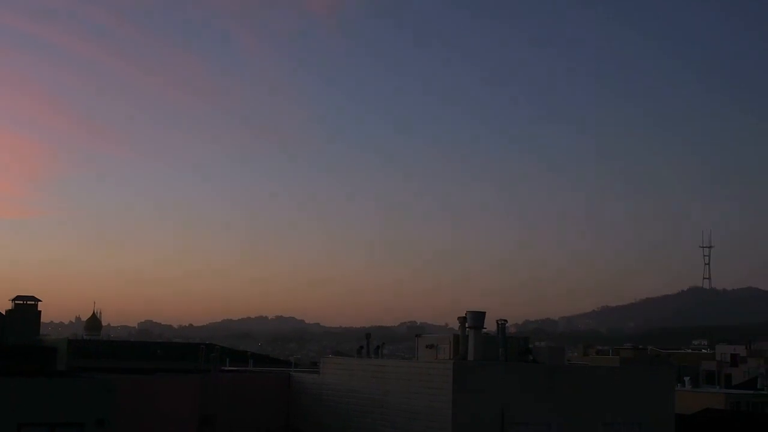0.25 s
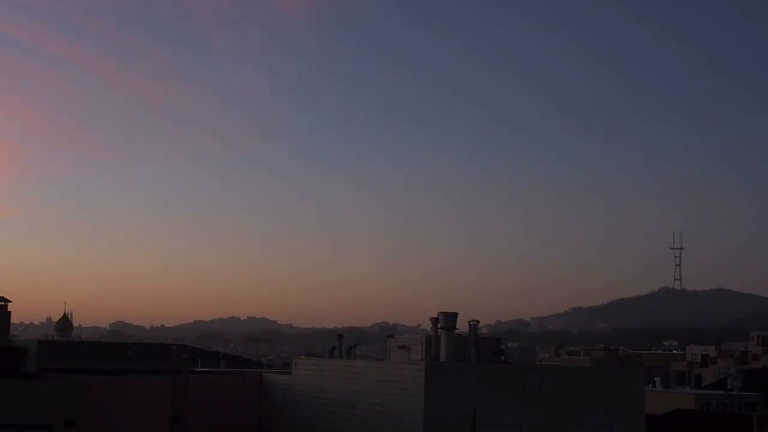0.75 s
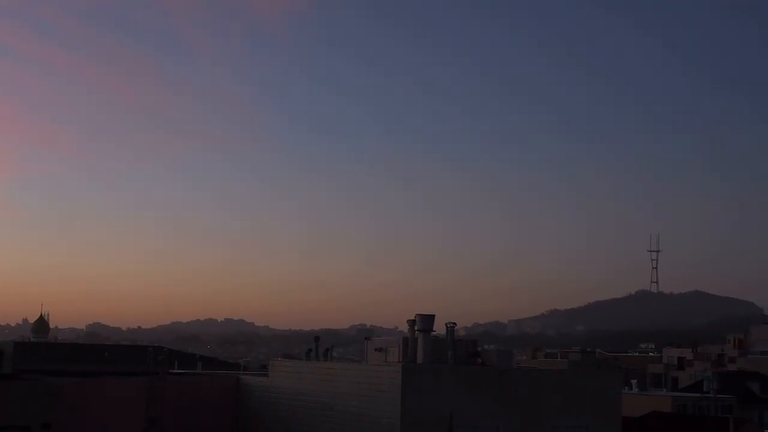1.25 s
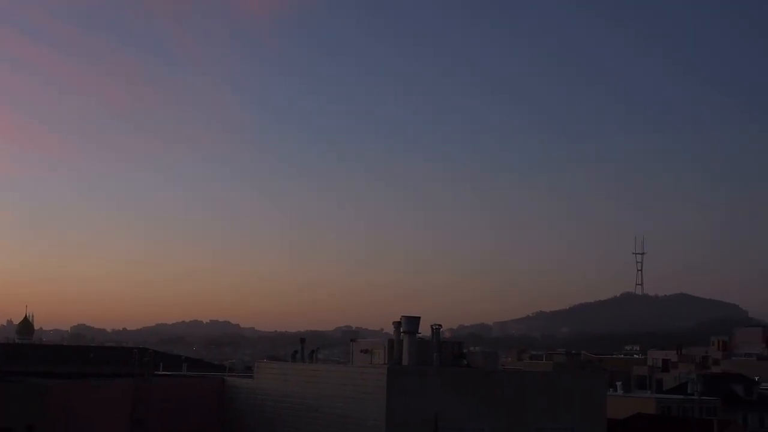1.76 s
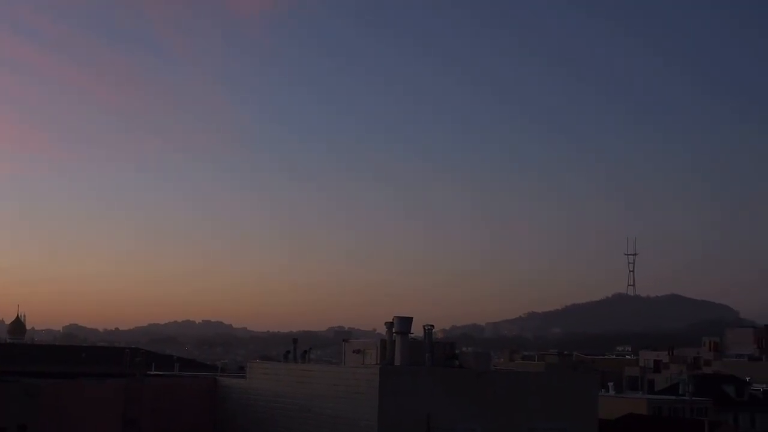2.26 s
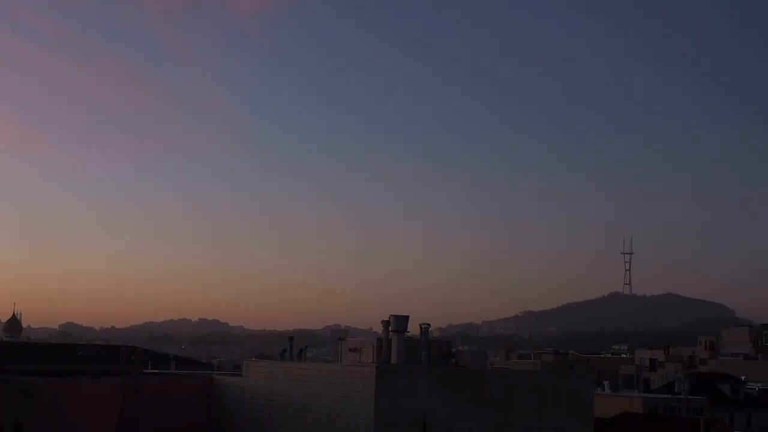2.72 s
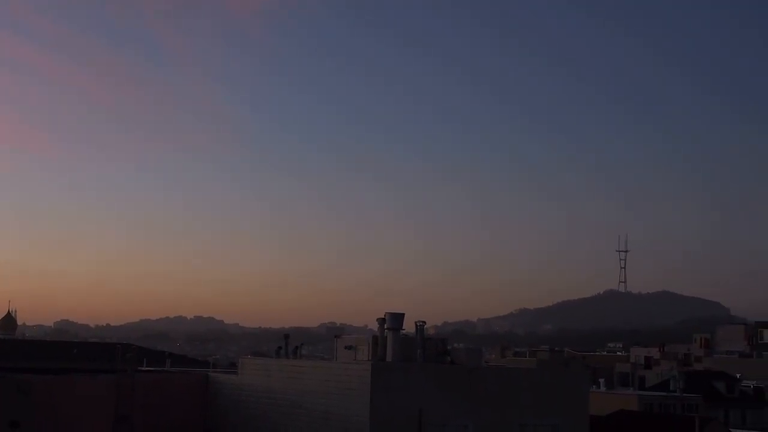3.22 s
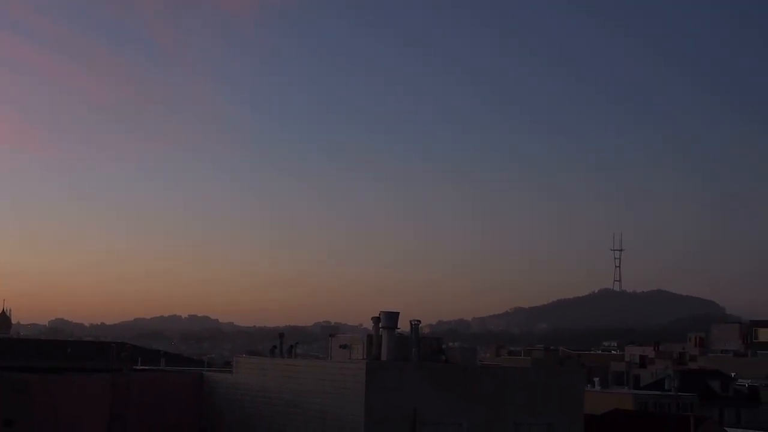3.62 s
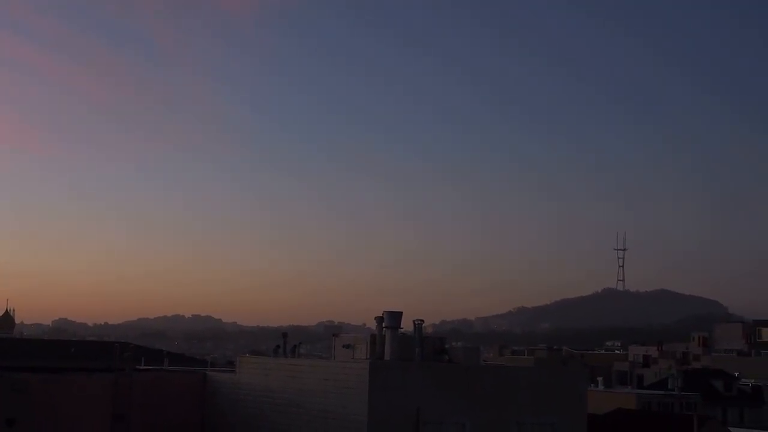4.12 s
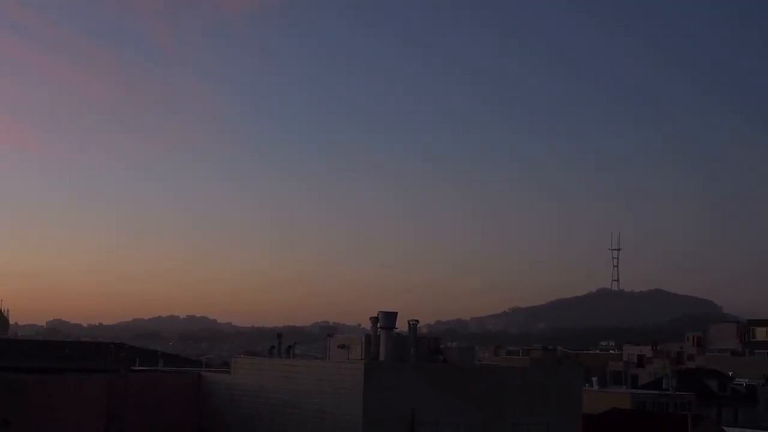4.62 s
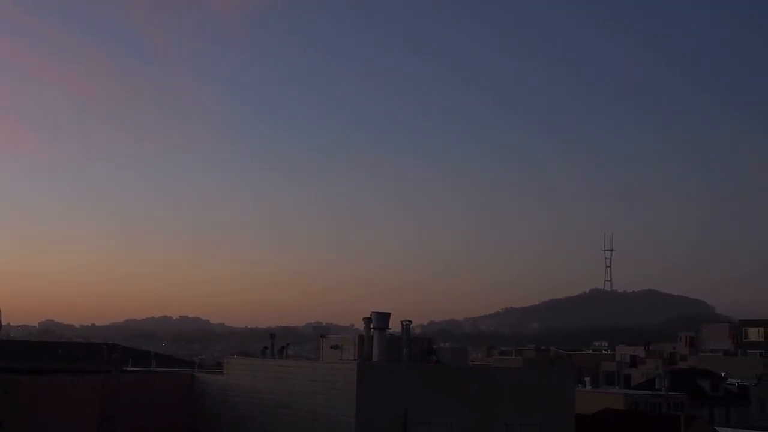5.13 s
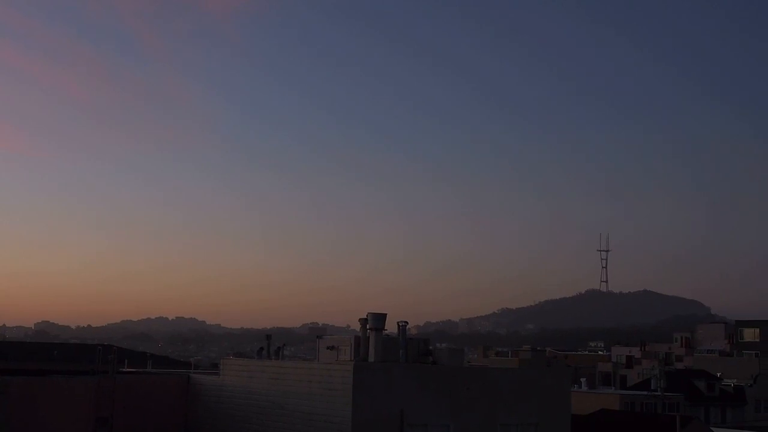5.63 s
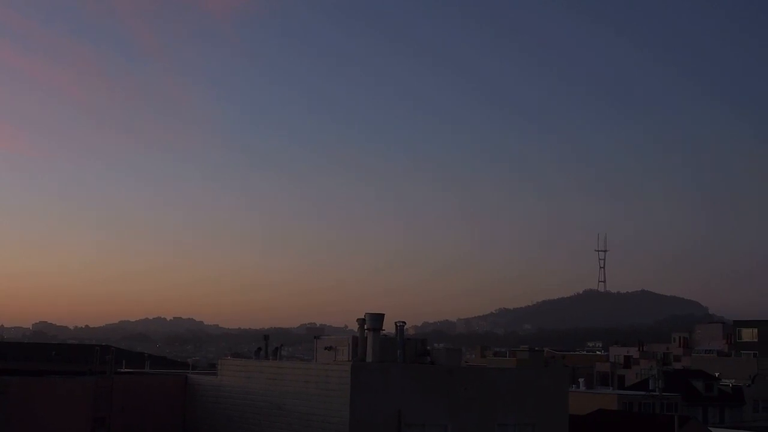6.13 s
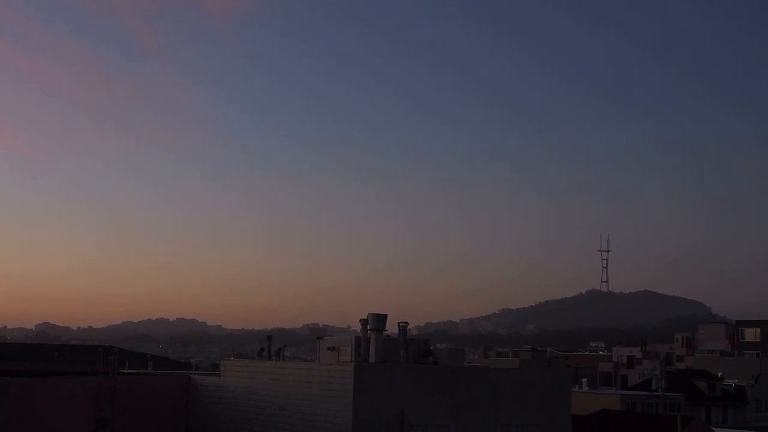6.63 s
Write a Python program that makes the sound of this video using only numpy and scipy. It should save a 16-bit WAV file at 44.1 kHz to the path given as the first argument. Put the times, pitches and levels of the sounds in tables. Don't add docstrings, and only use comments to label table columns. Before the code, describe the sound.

Wide stereo outdoor ambience above city roofs at dawn. A low, soft traffic rumble and fan hum run throughout. A songbird's rising whistle ends at the start, then five quick arched syllables and later four burry falling notes follow. A nearer bird on the left gives single sharp chips, loudest near the end. Faint distant chips and a thin trill fill the gaps, all echoing off walls.

```python
import sys
import numpy as np
from scipy import signal
from scipy.io import wavfile
from scipy.ndimage import uniform_filter1d

SR = 44100
rng = np.random.default_rng(int(sys.argv[2]) if len(sys.argv) > 2 else 0)


def decibels_to_gain(level_db):
    exponent = np.asarray(level_db, float) / 20
    return 10 ** exponent


def dump(signal):
    limited = np.clip(np.atleast_2d(signal).T, -1, 1)
    pcm = np.round(limited * 32767).astype(np.int16)
    wavfile.write(sys.argv[1], SR, pcm)


N = 302967
BEFORE = 22050

# [t/s from the onset, f/Hz, level/dB]
CHIP = [(0, 7400, -44), (.002, 5750, -24), (.0035, 5450, -17.5), (.007, 5230, -9), (.014, 4960, -7),
        (.024, 4760, -3), (.031, 4750, -8), (.039, 4880, -6.5), (.054, 4910, -24.5)]


def evened(x):
    return x / np.sqrt(np.mean(x ** 2) + 1e-20)


def read(points, hz):
    f, value = np.transpose(points)
    return np.interp(np.log(hz + 1), np.log(f + 1), value)


def city():
    # [f/Hz, level/dB per Hz]
    city_curve = [(20, -53), (33, -19), (114, -3), (187, -4.5), (224, -2.5), (262, -5.5), (291, -3.5),
                  (378, -9.5), (545, -9), (873, -11.5), (1080, -14), (1360, -20.5), (3060, -30.5),
                  (5030, -31.5), (15500, -48.5)]
    city_db = -39.5
    # [f/Hz, width/Hz, level/dB]
    far_chorus = [
        (5070, 270, -73),
        (7730, 310, -74.5),
        (11600, 1300, -79),
    ]
    # [t/s, level/dB]
    rumble = [(0, -42.5), (1.4, -41.5), (2.4, -45), (5.3, -44.5), (5.9, -42.5), (6.87, -41.5)]
    # [f/Hz, correlation]
    likeness = [(60, 0.92), (130, 1), (290, 0.97), (640, 0.88), (1410, 0.51), (3100, -0.23), (6820, 0.38),
                (15000, -1.6)]
    # [f/Hz, level/dB]
    left_lean = [(60, 3.0), (110, 2.4), (200, 3.5), (380, 2.9), (700, 3), (1290, 1.5), (2380, 1.6),
                 (4400, 1.2), (8120, 1.6), (15000, 0.81)]

    frames, hz = N // 512 + 5, np.fft.rfftfreq(2048, 1 / SR)
    a, b, c, d, patches = rng.standard_normal((frames, 1025, 5)).T
    patches = uniform_filter1d(uniform_filter1d(patches, 16, 0), 15, 1)
    patches = evened(patches)

    shape = decibels_to_gain(2 * read(city_curve, hz))
    power = shape[:, None] / np.sum(shape) * decibels_to_gain(2 * city_db)
    for centre_hz, width, db in far_chorus:
        bump = np.exp(-((hz[:, None] - centre_hz) / width) ** 2)
        power = power + decibels_to_gain(2 * db) * bump / (width / hz[1])

    rumble_db = np.interp(np.arange(frames) * 512 / SR, *np.transpose(rumble))
    swell_db = (rumble_db - rumble_db.mean()) * np.exp(-(hz[:, None] / 230) ** 2)

    same = np.clip(read(likeness, hz), 0, 1)[:, None]
    left = a + 1j * b
    right = same * left + np.sqrt(1 - same ** 2) * (c + 1j * d)
    lean = decibels_to_gain(read(left_lean, hz) / 2)[:, None]
    z = np.array([left * lean, right / lean]) * np.sqrt(power) * decibels_to_gain(swell_db + 0.79 * patches)
    return 1.004 * signal.istft(z, nperseg=2048, noverlap=1536)[1][:, :N]


def fuzzy(hz, width):
    r = np.exp(-np.pi * width / SR)
    noise = rng.standard_normal(N) + 1j * rng.standard_normal(N)
    slow = signal.lfilter([1], [1, -2 * r, r * r], noise)
    carrier = np.exp(2j * np.pi * np.cumsum(hz * np.ones(N)) / SR)
    return evened((slow * carrier).real)


def drones():
    # [f/Hz, level/dB]
    fans = [
        (210, -56.5),
        (232, -56),
        (297, -59.5),
        (408, -66),
    ]
    # [middle t/s, half length/s, f/Hz, glide/Hz per s, level/dB]
    engines = [
        (0.104, .25, 228.6, .1, -45.5),
        (.2, 0.69, 408.3, .1, -51.5),
        (0.99, 0.073, 227, .1, -43),
        (1.498, .13, 299, 0.11, -45),
        (2.767, 0.11, 300, .1, -46.5),
        (5.153, 0.18, 208.2, 0.1027, -42.5),
        (5.5, 0.59, 295.5, .1, -53.5),
        (6.5, 0.48, 223.2, 25.4, -49),
    ]
    t = np.arange(N) / SR
    tones = sum(decibels_to_gain(db) * fuzzy(hz, 5.9) for hz, db in fans)
    for s, half, hz, glide, db in engines:
        waver = 1 + 0.01196 * evened(uniform_filter1d(rng.standard_normal(N), 3000))
        turns = 2 * np.pi * np.cumsum((hz + glide * (t - s)) * waver) / SR
        swell = np.exp(-((t - s) / half) ** 2)
        tones = tones + decibels_to_gain(db) * swell * np.sqrt(2) * np.sin(turns)
    return tones * decibels_to_gain([[1.4], [-1.4]])


def add(mix, s, sound, pan_db):
    part = mix[:, BEFORE + round(s * SR):][:, :len(sound)]
    part += decibels_to_gain([[pan_db / 2], [-pan_db / 2]]) * sound[:part.shape[1]]


def whistle(shape, db, pitch, partials_db, burr_hz=0, depth=0, wobble=0.0071, beak=True, air_db=-60):
    beak_hz, beak_width_hz = 7700, 1400
    s, hz, level_db = np.transpose(shape)
    t = np.arange(0, s[-1], 1 / SR)
    hz = uniform_filter1d(np.interp(t, s, pitch * hz), 60, mode="nearest")
    level_db = uniform_filter1d(np.interp(t, s, level_db), 60, mode="nearest")

    chance = evened(uniform_filter1d(rng.standard_normal(len(t)), 120))
    flutter = np.sin(2 * np.pi * (np.cumsum(burr_hz * (1 + 0.19 * chance)) / SR + rng.random()))
    flutter *= depth * np.minimum(0.27 + t / 0.051, 1)
    turns = 2 * np.pi * np.cumsum(hz * (1 + flutter + wobble * chance)) / SR

    air = signal.butter(4, [3600, 7800], "band", fs=SR, output="sos")
    tone = decibels_to_gain(air_db) * signal.sosfilt(air, rng.standard_normal(len(t)))
    for k, partial_db in enumerate(partials_db, 1):
        passed = np.exp(-((k * hz - beak_hz) / beak_width_hz) ** 2) if beak and k > 1 else 1
        tone = tone + decibels_to_gain(partial_db) * passed * np.sin(k * turns)
    level = np.sqrt(2) * decibels_to_gain(db + level_db) * (1 + 3.2 * flutter)
    return level * tone * signal.windows.tukey(len(t), .04)


def streets(birds, walls, tail_db, count, lumpy_db=5.5):
    # [f/Hz, t60/s]
    decay = [(1500, 1.7), (2800, 1.57), (3500, 1.07), (4900, 2.9), (6500, 0.69), (10000, 0.59)]
    size = 2 * SR
    taps = np.zeros((2, size))
    at = np.arange(200, size - 20, 20) + rng.integers(0, 20, (2, (size - 201) // 20))
    np.put_along_axis(taps, at, rng.choice([-1., 1.], at.shape), 1)

    hz, t, z = signal.stft(taps + 0.35 * taps[::-1], SR, nperseg=256)
    lumps_db = lumpy_db * evened(uniform_filter1d(rng.standard_normal(len(t)), 5))
    fading_db = lumps_db - 60 * t / read(decay, hz)[:, None]
    tail = signal.istft(z * decibels_to_gain(fading_db), SR, nperseg=256)[1]
    tail *= decibels_to_gain(tail_db) / np.linalg.norm(tail[0])
    for s, left_db, right_db in walls:
        tail[:, round(s * SR)] += decibels_to_gain([left_db, right_db])

    source = np.sqrt(2) * birds.mean(0)[None]
    echoes = signal.fftconvolve(source, tail, axes=1)[:, :N + BEFORE]
    direct = np.array([np.roll(birds[0], count), birds[1]])
    return (direct + echoes)[:, BEFORE:]


def songster():
    # [t/s from the onset, f/Hz, level/dB]
    rise = [(0, 2168, -33), (.016, 2163, -16), (.027, 2240, -6), (.032, 2624, -9), (.044, 2667, -1.5),
            (.058, 2940, -0.5), (.064, 3370, -1), (.07, 3370, -20)]
    nasal = [(0, 1797, -15), (.006, 1760, -4), (.022, 1744, 1.5), (.032, 1728, -11), (.042, 1724, -17),
             (.058, 1767, -9), (.066, 1730, -24)]
    arch = [(0, 2885, -41), (.012, 3199, -15), (.022, 3383, -4.5), (.032, 3440, -2.5), (.037, 3377, 1.5),
            (.044, 2850, 2.5), (.05, 2278, -10.5), (.055, 2060, -31)]
    low_note = [(0, 2148, -53), (.012, 2364, -7.5), (.022, 2520, -2.5), (.034, 2568, -7.5),
                (.045, 2540, -16.5), (.055, 2532, -21)]
    burr = [(0, 2490, -21), (.005, 3006, -6), (.012, 3140, -4.5), (.035, 2942, 2), (.06, 2820, 0.5),
            (.09, 2707, 0), (.1, 2680, -18)]
    burr_low = [(0, 2400, -28), (.008, 2840, 2), (.025, 2707, 1.5), (.05, 2496, 2), (.075, 2360, -2),
                (.095, 2302, -4.5), (.105, 2290, -20)]
    nasal_partials_db = [-18.5, 3, -33, -17, -14.5]
    # [t/s, level/dB, pitch factor]
    rises = [
        (.026, -29.5, 0.98),
        (-.17, -28.5, 1),
        (-0.27, -25, 0.99),
    ]
    # [t/s, arch level/dB, pitch factor, delay of low note/s, low note level/dB]
    arches = [
        (2.468, -34.5, 1.01, 0.045, -28.5),
        (2.63, -31, 0.98, 0.058, -28),
        (2.797, -30.5, 0.98, 0.049, -23.5),
        (2.961, -29.5, .972, .055, -24.5),
        (3.132, -30.5, 0.96, 0.051, -26),
    ]
    # [t/s, level/dB, pitch factor, stretch in time, lower voice level/dB]
    burrs = [
        (4.372, -33.5, .99, 1.02, -35),
        (4.549, -33, 1.019, .68, -31.5),
        (4.716, -30, .97, .75, -38.5),
        (4.911, -30.5, 1.015, .66, -32),
    ]
    # [delay t/s, left level/dB, right level/dB]
    song_walls = [
        (0.031, -9, -18.5),
        (0.04, -16, -11),
        (.068, -20, -26),
        (.11, -40, -34),
        (.2, -20, -22),
    ]

    mix = np.zeros((2, N + BEFORE))
    for s, db, pitch in rises:
        rising = whistle(rise, db, pitch, [0, -40, -34], burr_hz=168.7, depth=0.024, air_db=-11.5)
        add(mix, s, rising, pan_db=0)
        ending = whistle(nasal, db - 6.5, pitch, nasal_partials_db, burr_hz=150.3, depth=0.072,
                         wobble=0.024, air_db=-9, beak=False)
        add(mix, s + 0.053, ending, pan_db=8.5)
    for s, db, pitch, delay, low_db in arches:
        arched = whistle(arch, db, pitch, [0, -18, -29], wobble=0.005, air_db=-25.5)
        add(mix, s, arched, pan_db=12.0)
        lower = whistle(low_note, low_db, 1.0, [0, -26, -30], air_db=-22.5)
        add(mix, s + delay, lower, pan_db=5.0)
    for s, db, pitch, stretch, low_db in burrs:
        for voice, voice_db in (burr, db), (burr_low, low_db):
            shape = np.array(voice) * [stretch, 1, 1]
            burry = whistle(shape, voice_db, pitch, [0, -12, -30.5, -28], burr_hz=195.7, depth=0.044,
                            wobble=.012, air_db=-30)
            add(mix, s, burry, pan_db=2.0)
    return streets(mix, song_walls, tail_db=-6.5, count=-1, lumpy_db=2.1)


def rustle():
    # [loudest t/s, level/dB, rise/dB per s, fall/dB per s]
    brushes = [
        (.102, -51, 450, 420),
        (5.22, -61, 500, 253),
        (5.43, -58, 73, 60),
        (5.61, -55, 47, 90),
        (5.695, -57, 600, 220),
    ]
    # [t/s, level/dB, f/Hz]
    ticks = [
        (0.7193, -42.5, 7860),
        (1.6357, -48, 8000),
        (5.4286, -35, 6800),
        (5.5962, -41, 9700),
        (5.6197, -49, 9600),
        (5.6955, -48, 5950),
        (5.7064, -48, 7100),
    ]
    t = np.arange(N) / SR
    strokes = [decibels_to_gain(db - np.maximum(rise * (s - t), fall * (t - s))) for s, db, rise, fall in brushes]
    level = np.max(strokes, axis=0)
    graininess = decibels_to_gain(3.2 * evened(uniform_filter1d(rng.standard_normal(N), 150)))
    grains = rng.standard_normal((2, N)) * graininess
    bright = signal.sosfilt(signal.butter(3, [5500, 9000], "band", fs=SR, output="sos"), grains)

    mix = np.zeros((2, N + BEFORE))
    t = np.arange(300) / SR
    for s, db, hz in ticks:
        ring = np.sin(2 * np.pi * hz * t * (1 - 25 * t))
        tick = decibels_to_gain(db - 60 * t / 0.023) * ring * np.minimum(t / 0.0003, 1)
        add(mix, s, tick, pan_db=.1)
    return level * evened(bright) + mix[:, BEFORE:]


def chipper():
    # [t/s, level/dB, pitch factor, left over right/dB]
    chips = [
        (.241, -31, 1, 19),
        (1.163, -31, 1, 10),
        (3.106, -25.5, 1.007, 14),
        (4.333, -22.5, 0.99, 13.5),
        (5.565, -19.5, 0.999, 10.5),
        (6.579, -29, 0.99, 5),
    ]
    # [delay t/s, left level/dB, right level/dB]
    chip_walls = [
        (.012, -26, -9.5),
        (.03, -37, -11.5),
        (0.043, -16.5, -33),
        (0.057, -18.5, -21),
        (.085, -28.5, -48),
        (.12, -44, -45),
    ]
    mix = np.zeros((2, N + BEFORE))
    for s, db, pitch, pan_db in chips:
        add(mix, s, whistle(CHIP, db, pitch, [0, -31], wobble=0.0042, beak=False), pan_db)
    return streets(mix, chip_walls, tail_db=-26.5, count=2)


def slur(length, start_hz, middle_hz, end_hz, db, partials_db=(0, -24), wobble=0.022):
    u = np.linspace(0, 1, 9)
    hz = np.polyval(np.polyfit([0, .5, 1], [start_hz, middle_hz, end_hz], 2), u)
    shape = np.transpose([u * length, hz, -14 * (2 * u - 1) ** 4])
    return whistle(shape, db, 0.97, partials_db, wobble=wobble, beak=False)


def far_birds():
    # [t/s, level/dB, pitch factor]
    far_chips = [(.574, -55, 1.02), (.684, -52, 0.99), (1.04, -60, 1.03), (1.269, -49, .99),
                 (1.345, -55, 1.03), (1.505, -57, 1), (1.727, -51, 1.04), (2.388, -51, 1.04),
                 (2.708, -48.5, 1.04), (3.295, -50, 1.001), (3.44, -56, 1.08), (3.585, -54.5, 1.001),
                 (3.636, -49.5, 1.06), (4.804, -56, 1), (4.995, -55, .98), (5.165, -50, 1.03),
                 (5.795, -56, 1.03), (6.078, -48.5, 0.99), (6.722, -51, 1), (.287, -38, 1.001),
                 (1.182, -44, 1.06), (1.203, -41, 1.001), (6.592, -39, 1.02)]
    # [t/s, length/s, start f/Hz, fall/Hz, level/dB]
    falls = [(0.814, 0.039, 3480, 700, -61), (.905, .03, 2250, 300, -63), (1.285, 0.027, 2250, 300, -62),
             (1.768, .035, 3500, 650, -64), (1.929, .03, 3190, 906, -60), (3.633, .025, 4080, 500, -60),
             (3.698, 0.019, 3470, 168.8, -55), (4.585, 0.024, 4670, 1100, -59),
             (5.252, .014, 4900, 700, -60), (5.382, .02, 4220, 350, -57), (5.632, 0.0163, 3900, 1000, -57),
             (5.684, .012, 3300, 300, -57), (5.73, .014, 3420, 600, -59), (.865, 0.0416, 3690, 350, -63),
             (1.195, .03, 2200, 250, -65), (6.157, .01, 5000, 606, -58), (6.164, .012, 5900, 1700, -65),
             (6.212, 0.013, 4600, 603, -62), (6.433, 0.02, 5550, 2000, -59.5)]
    # [t/s, length/s, start f/Hz, middle f/Hz, end f/Hz, level/dB]
    peaked = [(3.658, .042, 3450, 4180, 3500, -52)]
    # [t/s, length/s, start f/Hz, middle f/Hz, end f/Hz, level/dB]
    squeaks = [(1.582, .046, 575, 660, 585, -56)]
    squeak_partials_db = [-60, -60, -60, -26, -3, -1, -7]

    mix = np.zeros((2, N + BEFORE))
    for s, db, pitch in far_chips:
        add(mix, s, whistle(CHIP[1:-1], db, pitch, [0, -21], beak=False), pan_db=2.0)
    for s, length, hz, fall_hz, db in falls:
        add(mix, s, slur(length, hz, hz - fall_hz / 2, hz - fall_hz, db), pan_db=5.0)
    for s, *glide in peaked:
        add(mix, s, slur(*glide), pan_db=-14.0)
    for s, *glide in squeaks:
        add(mix, s, slur(*glide, squeak_partials_db, wobble=.004), pan_db=-3.0)

    for s in 3.722 + .0834 * np.arange(16):
        swell_db = 7.5 * np.exp(-((s - 3.94) / 0.21) ** 2)
        add(mix, s - .006, slur(.034, 5200, 5520, 5900, -66.5 + swell_db, wobble=.03), pan_db=-13)
        add(mix, s + 0.037, slur(0.014, 5170, 5000, 4000, -62 + swell_db), pan_db=-15)
    return streets(mix, [(.021, -12, -9), (.047, -15, -14)], tail_db=-8, count=-4)


def scene():
    return city() + drones() + songster() + rustle() + chipper() + far_birds()


def band_limit(x):
    return signal.sosfilt(signal.butter(12, 15610, fs=SR, output="sos"), x)


def record(dry):
    ports = np.array([np.roll(dry[0], 4), dry[1]])
    ports = signal.sosfilt(signal.butter(4, 22, "high", fs=SR, output="sos"), ports)
    ports = signal.sosfilt(signal.ellip(8, .5, 60, 15610, fs=SR, output="sos"), ports)
    return band_limit(ports)


dry = scene()
out = record(dry)
dump(out)
```